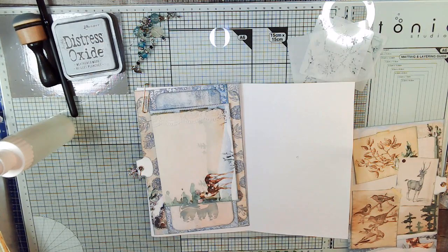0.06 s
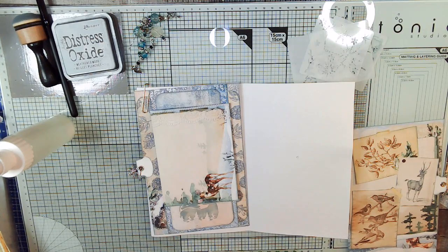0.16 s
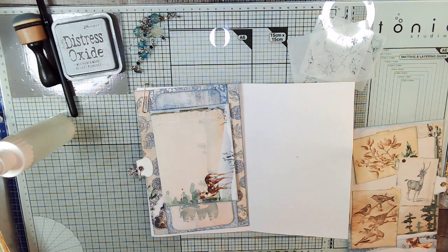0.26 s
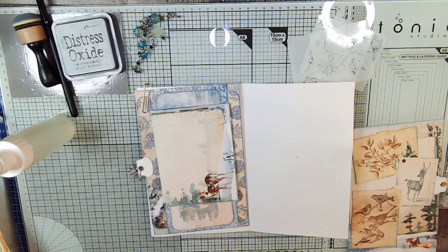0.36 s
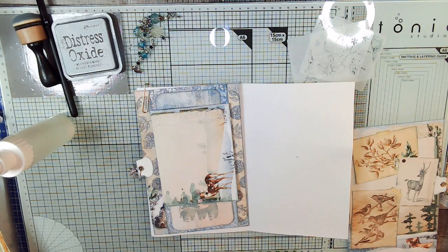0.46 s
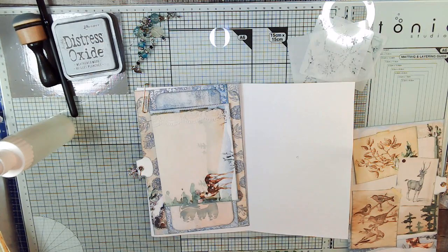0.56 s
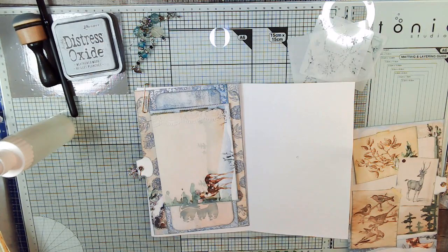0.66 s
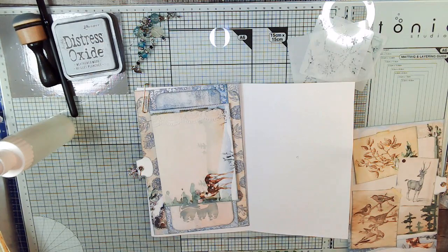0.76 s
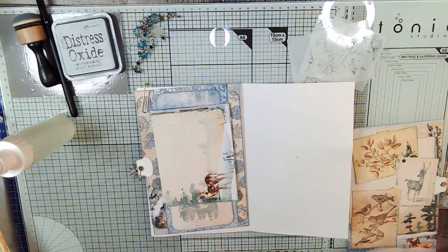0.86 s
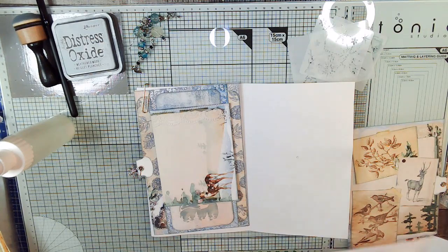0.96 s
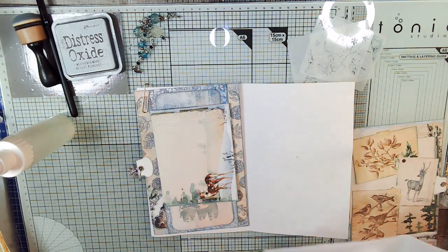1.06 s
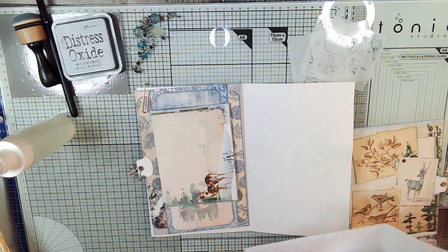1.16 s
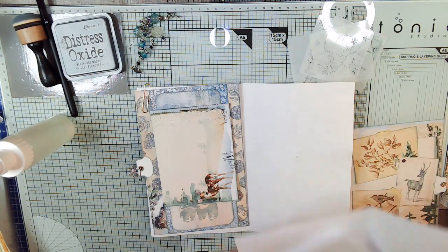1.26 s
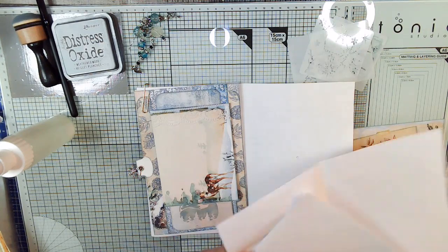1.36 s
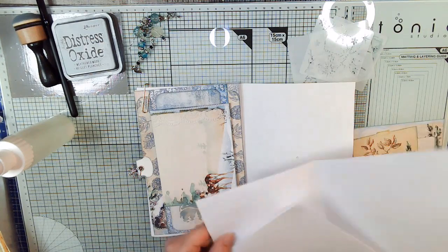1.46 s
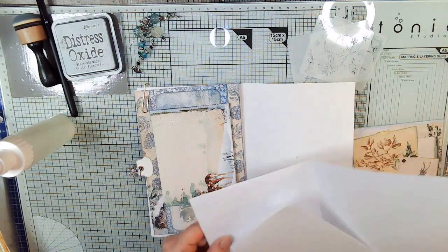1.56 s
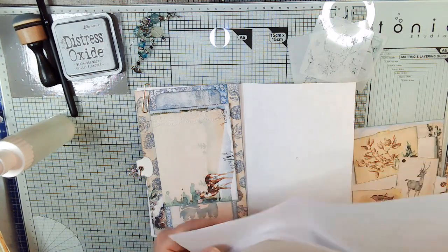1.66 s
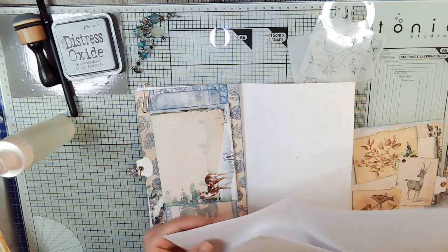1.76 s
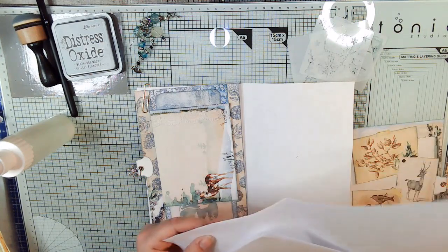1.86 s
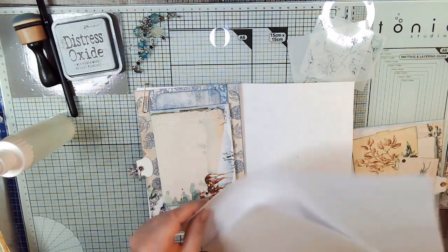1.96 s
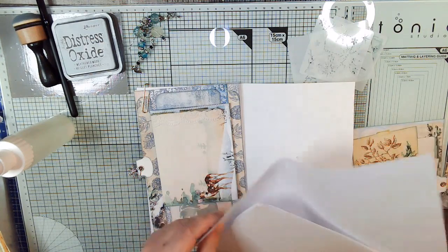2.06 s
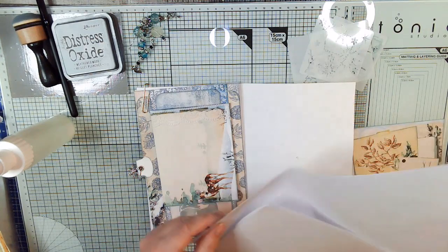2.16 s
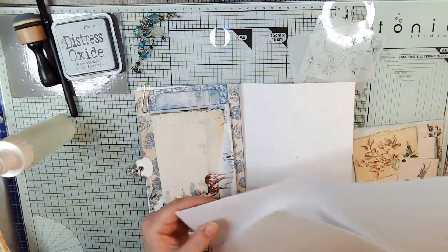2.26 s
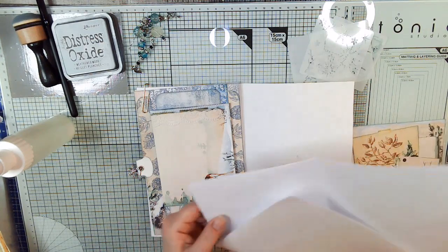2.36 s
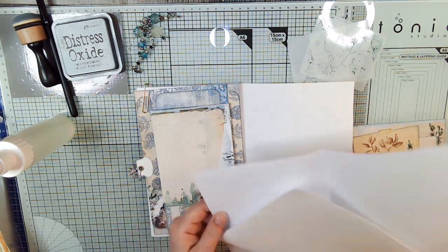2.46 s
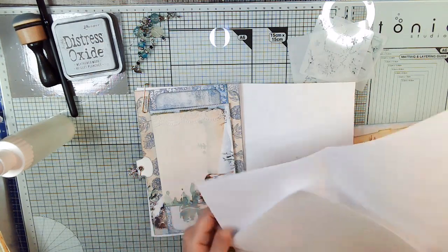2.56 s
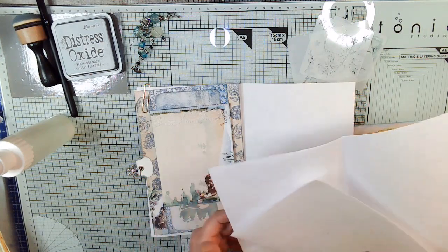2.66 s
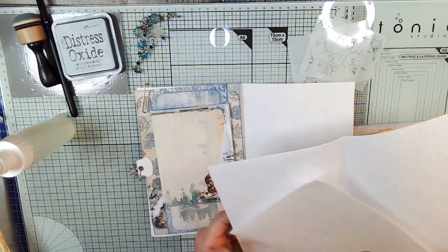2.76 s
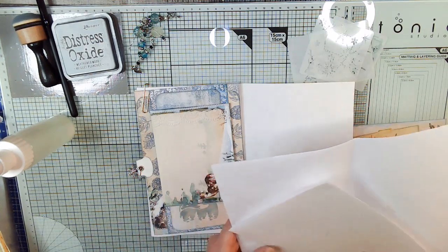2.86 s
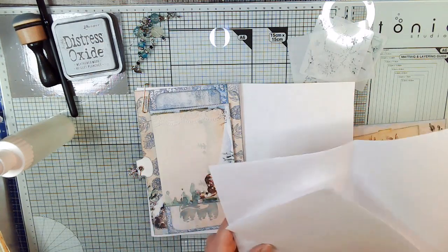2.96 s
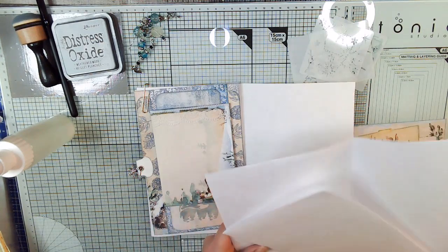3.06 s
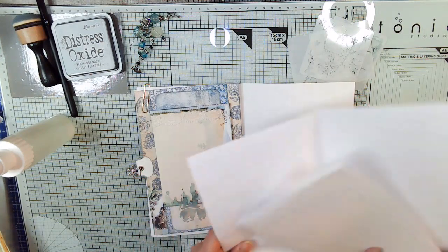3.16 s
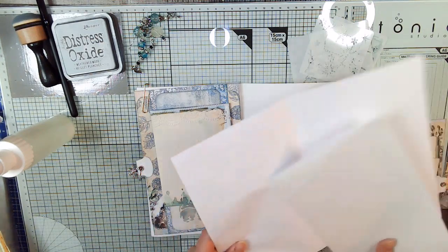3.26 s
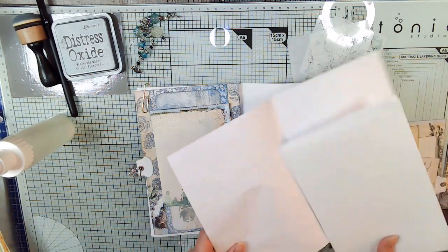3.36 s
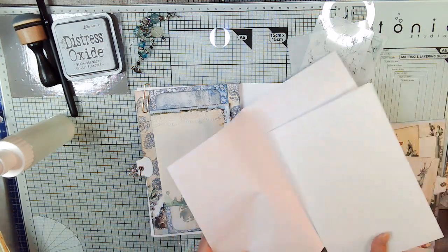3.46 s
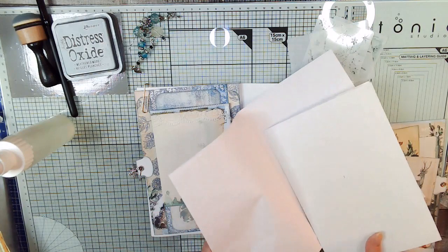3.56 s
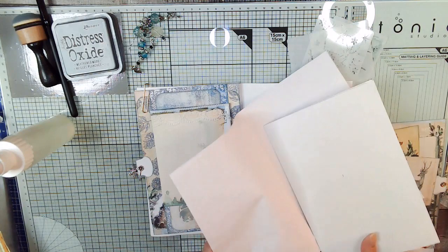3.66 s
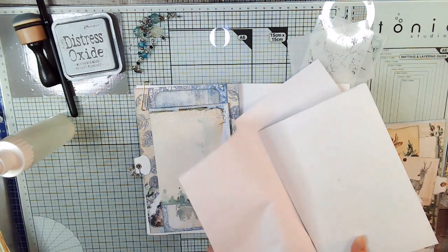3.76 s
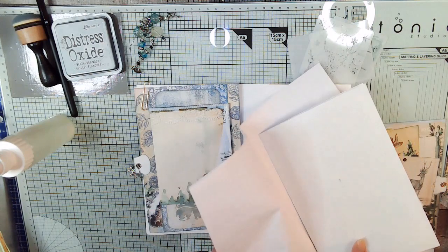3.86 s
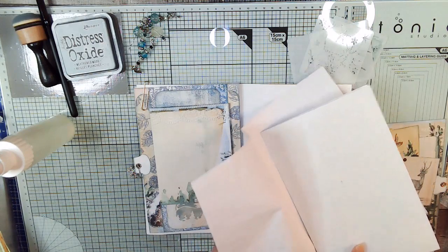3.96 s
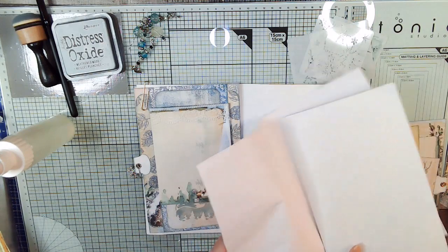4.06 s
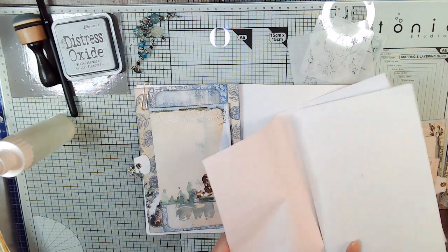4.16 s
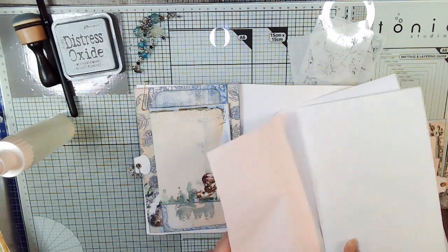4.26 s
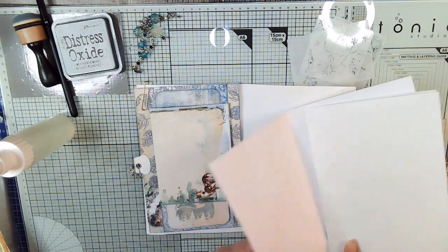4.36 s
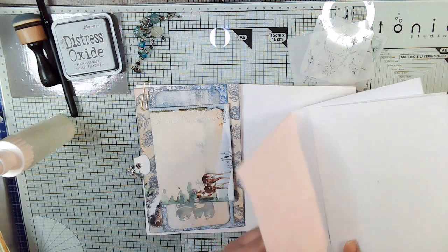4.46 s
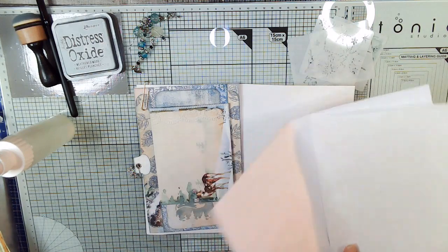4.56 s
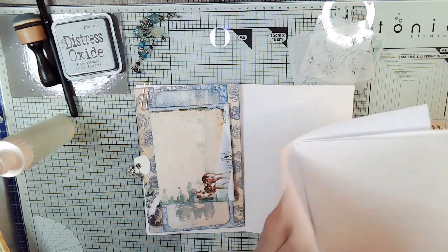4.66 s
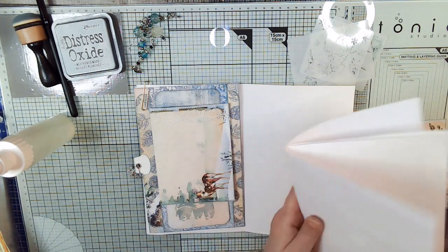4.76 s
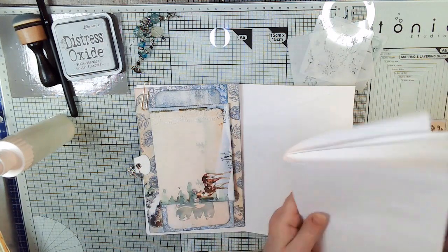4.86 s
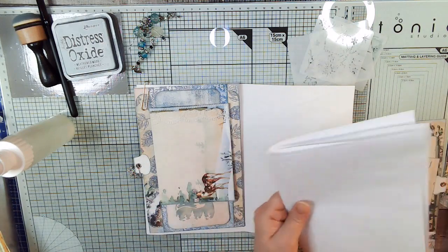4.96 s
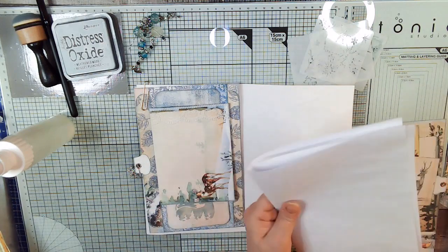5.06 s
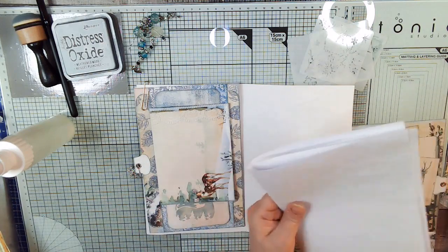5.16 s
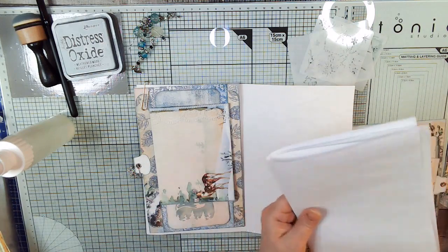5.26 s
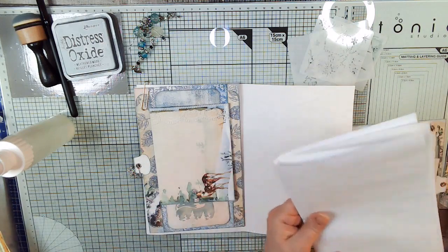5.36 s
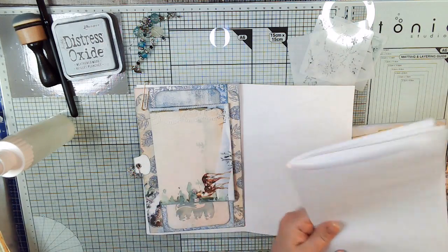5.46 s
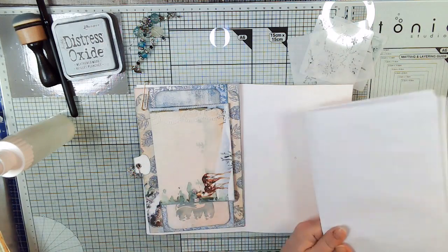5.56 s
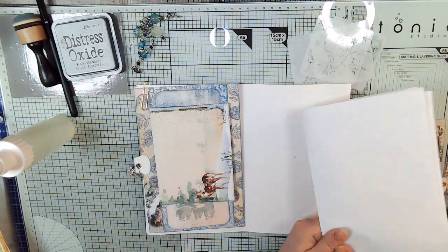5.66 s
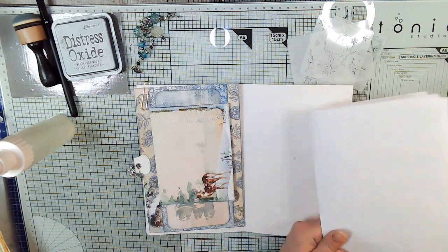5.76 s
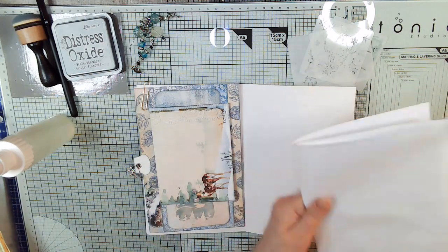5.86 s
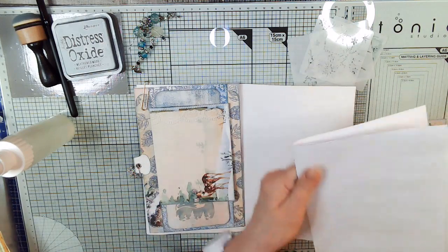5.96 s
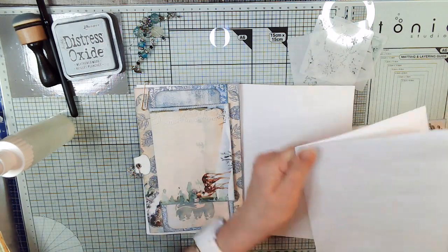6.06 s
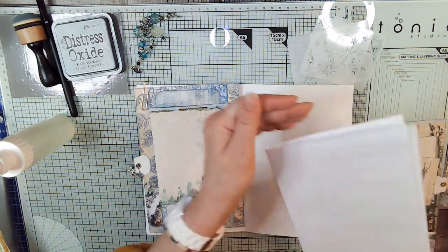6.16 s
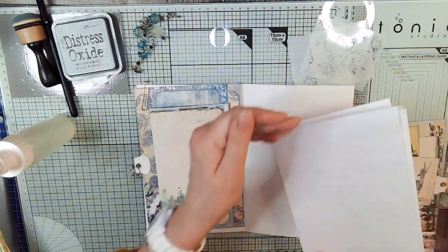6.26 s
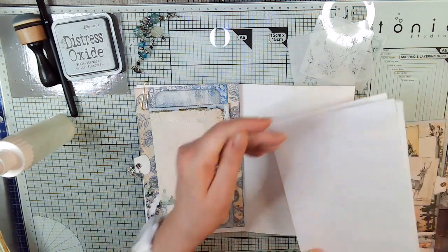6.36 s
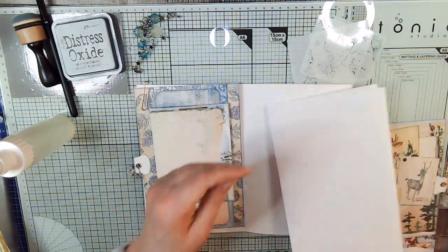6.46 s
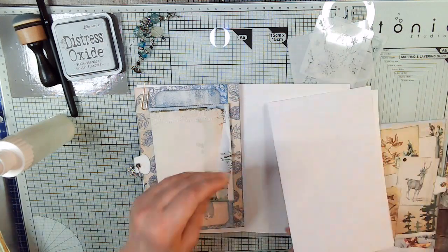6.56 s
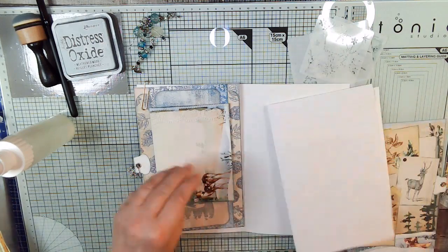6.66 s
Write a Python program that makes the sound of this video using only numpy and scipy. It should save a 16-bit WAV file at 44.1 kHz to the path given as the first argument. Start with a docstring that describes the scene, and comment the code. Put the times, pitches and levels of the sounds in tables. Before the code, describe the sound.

Hands lift, open and fold large sheets over a craft table. Quiet scuffs come first, then a crisp cluster of creases, a brief snap, and broad papery sweeps with hard pops midway. The thickest crumpling and sharpest cracks come late, before light brushing and small ticks. A single microphone in a small room catches it all with low hum and a thin high whine.

```python
"""At a craft table in a small room, under one microphone, hands lift, slide and shuffle paper and card.
Light hissing slides come first; from 1.4 s folds snap in bursts, thickest and loudest from 4.4 to 5.8 s,
then the handling thins out to faint rubs. A faint hum and the whine of a lamp run throughout.
Slides, scuffs and bends are coloured gritty noise, snaps are short kinks answered by table top and room,
wobbles of loose sheets are narrow noise under soft swells, and the background is noise and unsteady tones."""
import sys
import numpy as np
from scipy import signal
from scipy.fft import rfft, irfft, next_fast_len
from scipy.io import wavfile
from scipy.ndimage import uniform_filter1d, map_coordinates

SR = 44100
rng = np.random.default_rng(int(sys.argv[2]) if len(sys.argv) > 2 else 0)


def store_pcm(level_fs):
    """Save levels as 16-bit WAV."""
    pcm = np.round(np.clip(level_fs, -1, 1) * 32767).astype(np.int16)
    wavfile.write(sys.argv[1], SR, np.atleast_2d(pcm).T)


N = 296352  # samples, 6.72 s

# Strokes of the hands. Each row: peak time in seconds, rise in seconds, fall in seconds, sliding level in dB,
# bending level in dB, scuffing edges level in dB, fine sheen in dB over the slide; levels hold at the peak.
HAND_STROKES = [(0.05, .15, .1, -73.5, -69, -65, -12), (0.12, 0.12, 0.11, -58, -66, -59, -24),
                (0.309, .07, 0.11, -49, -60, -55.5, -10), (0.47, 0.08, .1, -47.5, -65, -55.5, -13),
                (0.59, 0.098, 0.56, -47, -66, -55, -9), (0.749, 0.066, 0.064, -46, -49, -45, -1.5),
                (0.81, 0.12, .08, -47, -67, -65, -7), (1.0, 1, 1, -51.5, -64, -62, -12),
                (1.403, 0.077, 0.12, -40.5, -47.5, -54.5, -12.5), (1.482, 0.064, 0.076, -40, -42, -36, -20),
                (1.566, 0.063, 0.076, -43, -34.5, -39.5, -26), (1.63, 0.065, 0.12, -59, -53, -48.5, -23),
                (1.83, 0.9, 0.34, -51.5, -70, -61.5, -3), (2.092, 0.11, .1, -38, -48, -42.5, -11),
                (2.145, 0.062, 0.089, -57, -38.5, -45, -18),
                (2.187, 0.052, 0.061, -35.5, -41.5, -32.5, -32), (2.29, 0.22, 0.21, -49, -51.5, -46, -11),
                (2.38, .1, 0.092, -63, -55.5, -60, 2), (2.44, 0.084, 0.084, -51, -75, -66, 1.5),
                (2.64, 0.36, 0.6, -51.5, -57.5, -59, -7), (2.701, 0.093, 0.064, -49, -52.5, -49.5, -19),
                (2.89, 0.23, 0.44, -54, -69, -67.5, -6.5), (3.0, 0.032, 0.94, -54, -56.5, -64, -22),
                (3.231, 0.088, 0.17, -34, -46.5, -42.5, -12), (3.362, 0.21, .35, -31.5, -46, -36, -11),
                (3.515, 0.14, 0.053, -59, -41.5, -33.5, -23), (3.565, .15, 0.36, -44, -45, -55, -6),
                (3.71, 0.16, 0.34, -39, -44, -40, -14), (3.911, 0.1, 0.27, -38.5, -46, -40.5, -18),
                (4.042, 0.054, 0.59, -35, -46, -37.5, -14), (4.221, 0.078, 0.058, -34.5, -54, -40.5, -12),
                (4.32, 0.057, 0.15, -44, -48, -48, -25), (4.399, 0.051, 0.19, -48.5, -42, -45.5, -7),
                (4.53, 0.064, .14, -46.5, -53, -50.5, -21), (4.671, 0.13, 1, -40.5, -45.5, -45, -7.5),
                (4.805, 0.057, 0.11, -39, -35, -31.5, -5), (4.92, 0.029, 0.047, -40, -29.5, -28.5, -24),
                (4.97, 0.086, 0.037, -27, -36.5, -28, -15), (5.092, 0.12, 0.086, -30, -46.5, -31, -12),
                (5.188, 0.029, 0.029, -42.5, -36, -32, -17), (5.26, 0.32, 0.25, -45.5, -58, -52, -8),
                (5.313, 0.039, .06, -34.5, -50, -36, -4), (5.331, 0.042, 0.067, -40, -40.5, -31.5, -15),
                (5.536, 0.24, 0.3, -36.5, -53.5, -43, -5.5), (5.618, 0.2, 0.11, -31.5, -65, -51, -5.5),
                (5.73, 0.028, 0.038, -59, -37, -39.5, -21), (5.77, 0.017, 0.12, -45, -65, -51, -24),
                (5.86, 0.14, 0.4, -43.5, -68, -45, -21), (5.971, 0.15, 0.18, -36, -40.5, -41, 1),
                (6.05, 0.36, 0.4, -33.5, -66, -43.5, -3), (6.2, 0.14, .3, -43.5, -46, -48.5, -21),
                (6.46, 0.3, 0.37, -58.5, -71, -60, -4), (6.52, 0.059, .2, -46, -75, -53, -5.5),
                (6.585, 0.056, 0.1, -48.5, -48, -48.5, -7), (6.71, 0.25, .2, -59, -71, -55, -15)]
# Moments when sheets come apart and strokes past their peak stop. Each entry: time in seconds.
PARTINGS_S = [1.29, 1.9, 2.33, 2.74, 3.581, 3.942, 4.245, 5.12, 5.659, 6.233]
# Colour of sheet faces sliding. Each row: frequency in Hz, relative level in dB per Hz.
SLIDE_COLOUR = [(1880, -35), (3200, -7.5), (4360, -4), (4690, -1), (5740, 0.5), (9180, -9.5),
                (11000, -16.5), (14300, -69), (22000, -120)]
# Colour of the fine sheen on a slide. Each row: frequency in Hz, relative level in dB per Hz.
SHEEN_COLOUR = [(4710, -26), (8000, -3.5), (10600, -8.5), (13500, -27), (15500, -34)]
# Colour of scuffing edges. Each row: frequency in Hz, relative level in dB per Hz.
SCUFF_COLOUR = [(760, -37), (1200, -8), (1600, -1.5), (2300, -0.5), (2800, 0.5), (3400, -6.5), (4400, -3),
                (7500, -60)]
# Colour of bending sheets. Each row: frequency in Hz, relative level in dB per Hz.
BEND_COLOUR = [(120, -32.5), (220, -17.5), (400, -7.5), (700, 0), (1000, 1.5), (1400, -3.5), (2100, -17),
               (3300, -72)]
# Folds popping through; the row at 5.767 s is a strong return of the 5.7619 s snap from the hard surface
# nearby. # Each row: start in seconds, pop level in dB, pop pitch in Hz, crack level in dB, # crack pitch in
# kHz, share of after-slips from 0 to 1; levels are for a full kink, before the slips.
FOLD_SNAPS = [(0.1106, -41, 2950, -57, 5.7, 0.75), (1.4447, -29.5, 715, -23.5, 5.9, 0.35),
              (1.4711, -21.5, 660, -44, 5.3, 0.4), (1.4829, -30, 820, -30, 5.7, 0.3),
              (1.4966, -22.5, 1100, -50, 5.3, 0.3), (1.551, -24, 2200, -20.5, 7, 0.22),
              (1.6463, -30, 1140, -37, 5.2, 0.15), (2.1623, -34, 667, -21, 5.2, 0.45),
              (2.183, -35, 2500, -15.5, 4.5, 0.5), (2.6884, -34.5, 1370, -54, 7.4, 0.63),
              (3.0676, -31.5, 1510, -29, 7.1, 0.13), (3.4756, -13.5, 1030, -16.5, 3.7, 0.25),
              (3.499, -15, 1080, -56, 5.2, 0.25), (3.5084, -12.5, 1120, -19, 3.5, 0.33),
              (3.5181, -20.5, 720, -47, 4.6, .15), (3.8181, -19, 970, -43, 5.1, 0.14),
              (4.0106, -31, 980, -49, 5.1, 0.45), (4.4484, -23.5, 2700, -29, 4.6, 0.2),
              (4.5203, -18, 1000, -60, 6.1, 0.52), (4.5277, -17, 865, -38, 4.2, 0.13),
              (4.652, -32, 2340, -41, 3.6, 0.5), (4.7215, -24, 720, -29, 5.6, 0.6),
              (4.7711, -11, 890, -24, 4.3, .18), (4.7975, -10.5, 1400, -5.5, 4.44, 0.22),
              (4.819, -30.5, 580, -14, 4.4, 0.3), (4.885, -24, 1140, -27, 6.2, 0),
              (4.9143, -18, 1520, -13, 4.9, 0.56), (4.9615, -15, 2730, -12, 4.4, 0.65),
              (5.1806, -15.5, 694, -40, 4.6, 0), (5.183, -19, 970, -18, 3.7, 0.09),
              (5.3265, -16, 2170, -23, 5.6, 0.39), (5.5305, -22, 1100, -32, 6.7, 0.1),
              (5.7268, -21, 1990, -25, 3.3, 0.14), (5.7619, -23.5, 1950, -12, 6.6, 0.3),
              (5.767, -41, 2000, -38, 7.9, 0.2), (5.9534, -21, 1500, -36, 6.2, .35),
              (5.9818, -27.5, 2230, -18.5, 4.6, 0.67), (6.2183, -41, 2220, -32, 6.0, .1),
              (6.3916, -47, 2150, -65, 5.2, 0.85), (6.5063, -31, 2860, -23.5, 9.3, 0.48),
              (6.5177, -38, 2800, -55, 6.8, .1), (6.5255, -46, 2900, -17, 8, 0.22),
              (6.537, -37, 3000, -47, 6.7, 0.2), (6.5695, -27, 794, -54, 5.8, 0.15)]
# Loose sheets wobbling or ringing dully. Each row: centre in seconds, rms level in dB at the top of the swell,
# pitch in Hz, swell length (standard deviation) in seconds, half-width as a share of the pitch.
SHEET_WOBBLES = [(0.12, -59, 1245, 0.031, 0.08), (0.312, -56.5, 466, 0.015, 0.13),
                 (0.75, -46.5, 820, 0.011, 0.16), (1.732, -43.5, 138, 0.027, 0.39),
                 (1.79, -49.5, 150, 0.034, 0.37), (2.155, -55.5, 176, 0.038, 0.58),
                 (2.387, -57, 1380, 0.071, 0.11), (2.4, -59, 1940, 0.063, 0.066),
                 (4.898, -53.5, 112, 0.024, 0.46), (5.98, -48, 354, 0.031, 0.42),
                 (6.585, -56, 320, 0.027, 0.15)]
# Decay of the small room. Each row: frequency in Hz, time to fall 60 dB in seconds.
ROOM_DECAY = [(300, 0.21), (2000, 0.046), (10000, 0.16)]
# Colour of room and microphone noise. Each row: frequency in Hz, relative level in dB per Hz.
AIR_COLOUR = [(15, -55), (25, -17), (148, 18), (615, 9), (722, 1), (1200, -20), (2560, -3), (2850, 6),
              (3730, -24), (6050, -1.5), (10900, -26), (12200, -11), (15500, -15.5)]
# Electric hum and whine. Each row: frequency in Hz, rms level in dB, half-width in Hz.
ELECTRIC_TONES = [(120, -75, 14), (6062, -82, 25), (11294, -74, 6)]

SWELL_DB, ROUNDNESS = 20.5, 0.9  # dB a slide gains over its rise and loses over its fall; 1 = pointed top
PARTING_DB_PER_S = 331  # how fast a slide stops when the sheets part
CRUMPLE_SWING = 0.88  # dB swing of bending and scuffing, as a multiple of the sliding's
SWELL_STEP = 32  # samples between points of the stroke curves
AIR_DB = -63  # rms
BAND_LIMIT_HZ = 15680


def rustle():
    """Sliding faces hiss high; edges scuff in the middle; bending sheets crackle low and coarse."""
    slide_db, bend_db, scuff_db, sheen_db = np.transpose(HAND_STROKES)[3:, :, None]
    slide_loss = swells()
    crumple_loss = CRUMPLE_SWING * slide_loss
    slide = strokes_level(slide_db - slide_loss) * grit(SLIDE_COLOUR, spiky_db=1.2, clump_db=1.0, patchy_db=2.0)
    sheen_level = strokes_level(slide_db + sheen_db - slide_loss)
    sheen = sheen_level * grit(SHEEN_COLOUR, spiky_db=4.0, clump_db=0.1, patchy_db=5.0)
    scuff = strokes_level(scuff_db - crumple_loss) * grit(SCUFF_COLOUR, spiky_db=2.5, clump_db=1.4, patchy_db=3.5)
    bend = strokes_level(bend_db - crumple_loss) * grit(BEND_COLOUR, spiky_db=3, clump_db=1.87, patchy_db=3.5)
    return slide + sheen + scuff + bend


def swells():
    """Loss in dB of every stroke over time: up to its peak, then away, cut short when the sheets part."""
    peak, rise, fall = np.transpose(HAND_STROKES)[:3, :, None]
    t = np.arange(0, N, SWELL_STEP) / SR
    next_parting = np.append(PARTINGS_S, N / SR)[np.searchsorted(PARTINGS_S, peak)]
    distance = np.where(t < peak, (peak - t) / rise, (t - peak) / fall)
    return SWELL_DB * distance ** ROUNDNESS + PARTING_DB_PER_S * np.maximum(t - next_parting, 0)


def strokes_level(db):
    """Overlapping strokes add in power to one gain curve."""
    together = np.linalg.norm(amp(db), axis=0)
    return np.interp(np.arange(N), np.arange(0, N, SWELL_STEP), together)


def grit(colour, spiky_db, clump_db, patchy_db):
    """Tiny contacts of uneven size, in clumps; narrow bands of their colour swell and fade slowly; rms 1."""
    spikes_db = spiky_db * np.minimum(rng.exponential(size=N), 5)  # a negative setting makes dips
    clumps_db = clump_db * (wobble(40) + wobble(150))
    contacts = rng.standard_normal(N) * amp(spikes_db + clumps_db)
    bands = signal.stft(contacts, nperseg=512)[2]
    patches = uniform_filter1d(rng.standard_normal(bands.shape), size=2, axis=0)  # across frequency
    patches = uniform_filter1d(patches, size=18, axis=1)  # along time, about 0.1 s
    patchy = signal.istft(bands * amp(patchy_db * unit(patches)), nperseg=512)[1][:N]
    return unit(filtered(patchy, lambda hz: amp(along(colour, hz))))


def snaps():
    """Each fold gives a low pop and a sharp crack at its own pitch; a near surface and the room answer."""
    out, t = np.zeros(N + SR), np.arange(SR // 16) / SR
    for start, pop_db, pop_hz, crack_db, crack_khz, share in FOLD_SNAPS:
        crack_hz = 1000 * crack_khz
        chance, sizes = rng.random(len(t)), rng.standard_normal(len(t))
        dying = amp(-60 * t / 0.069)
        slips = share * dying * sizes * (chance < 1500 / SR)  # about 1500 slips a second
        slips[0] = 1 - share / 2  # a crumpling fold starts less sharply
        pop = amp(pop_db) * kink(t, pop_hz, 1.22, slips)
        crack = amp(crack_db) * kink(t, crack_hz, 1.3, slips)
        middle_gain = amp((pop_db + crack_db) / 2 - 8.0)
        middle = middle_gain * kink(t, np.sqrt(pop_hz * crack_hz), 1.0, slips)
        snap = pop - middle + crack  # the middle fills in between the two
        answer = amp(-9.5) * signal.fftconvolve(snap, tail())
        answer[:len(t)] += snap
        answer[280:][:len(t)] += amp(-10.5) * snap  # back from a hard surface 6.3 ms later
        out[round(start * SR):][:len(answer)] += answer
    # the snaps carry little deep bass, and their cracks hold little above 11 kHz
    return filtered(out[:N], lambda hz: (1j * hz / (300 + 1j * hz)) ** 2 / (1 + (hz / 11000) ** 8))


def kink(t, hz, turns, slips):
    """A few cycles that start softly and stop soon, peak near 1, repeated by each smaller slip."""
    cycles = t * hz
    shape = np.sin(2 * np.pi * cycles) * np.sqrt(cycles) * np.exp(-(cycles / turns) ** 2)
    return signal.fftconvolve(slips, shape / np.abs(shape).max())[:len(t)]


def tail():
    """A dense room answer of energy 1 in which each frequency dies at its own speed."""
    hz, t, bands = signal.stft(rng.standard_normal(SR // 4), SR, nperseg=128)
    decay = amp(-60 * t / along(ROOM_DECAY, hz)[:, None])
    dying = signal.istft(bands * decay, SR, nperseg=128)[1]
    return np.pad(dying / np.linalg.norm(dying), (150, 0))  # arrives 3.4 ms late


def wobbles():
    """A loose sheet flaps or rings dully: narrow rough noise under a soft swell."""
    out, t = np.zeros(N), np.arange(N) / SR
    for centre, db, pitch, length, width in SHEET_WOBBLES:
        swell = np.exp(-.5 * ((t - centre) / length) ** 2)
        rough = swell * rng.standard_normal(N)
        flap = filtered(rough, lambda hz: 1 / (1 + ((hz - pitch) / (width * pitch)) ** 4))
        out += amp(db) * unit(flap) * np.sqrt(np.mean(swell ** 2))
    return out


def background():
    """Room and microphone noise that drifts, and unsteady electric tones made of very narrow noise."""
    drift_db = 0.27 * wobble(3.5)
    total = amp(AIR_DB + drift_db) * grit(AIR_COLOUR, spiky_db=-3.2, clump_db=1.0, patchy_db=4.5)
    for pitch, db, width in ELECTRIC_TONES:
        line = filtered(rng.standard_normal(N), lambda hz: 1 / (1 + ((hz - pitch) / width) ** 2))
        strength = uniform_filter1d(abs(line), size=2000) + .2 * line.std()
        total = total + amp(db) * unit(line / strength)  # wavers, but keeps its strength
    return total


def amp(db):
    """Decibels to gain."""
    return 10 ** (np.asarray(db) / 20)


def unit(x):
    """Scaled to rms 1."""
    return x / np.sqrt(np.mean(x ** 2) + 1e-20)


def along(points, hz):
    """Values between (Hz, value) points on a log frequency axis."""
    f, v = np.transpose(points)
    return np.interp(np.log(hz + 1), np.log(f + 1), v)


def wobble(rate):
    """A smooth random curve, rate knots a second."""
    knots = rng.standard_normal(int(N * rate / SR) + 4)
    return map_coordinates(knots, [np.arange(N) * rate / SR])


def filtered(x, response):
    """x times a complex response of frequency, padded so that the end does not wrap to the start."""
    m = next_fast_len(N + SR // 2)
    return irfft(rfft(x, m) * response(np.fft.rfftfreq(m, 1 / SR)), m)[..., :N]


def scene():
    """The handling, its room answer and the background reach one microphone, which feeds both channels."""
    rub = rustle()
    rub_in_room = rub + amp(-10.5) * signal.fftconvolve(rub, tail())[:N]
    mono = rub_in_room + snaps() + wobbles() + background()
    return np.array([mono, mono])


def record(dry):
    """The microphone drops the deepest bass; nothing above the band limit is kept."""
    return filtered(dry, lambda hz: (1j * hz / (45 + 1j * hz)) ** 2 * (hz < BAND_LIMIT_HZ))


dry = scene()
out = record(dry)
store_pcm(out)
```